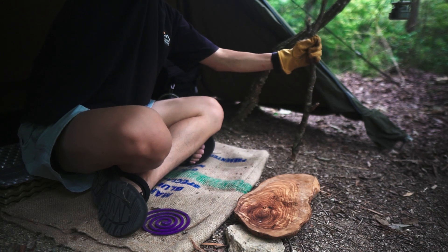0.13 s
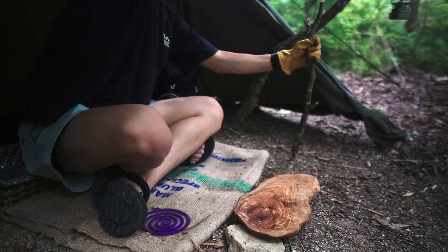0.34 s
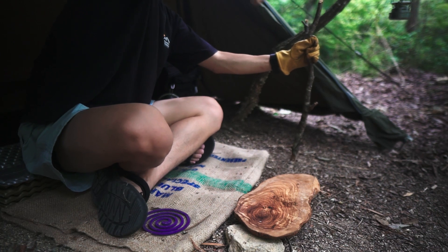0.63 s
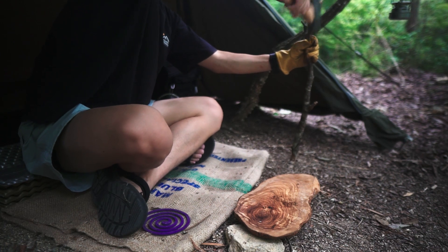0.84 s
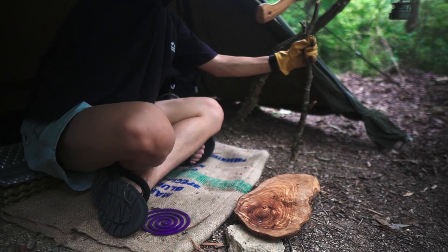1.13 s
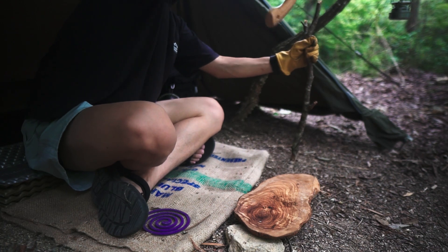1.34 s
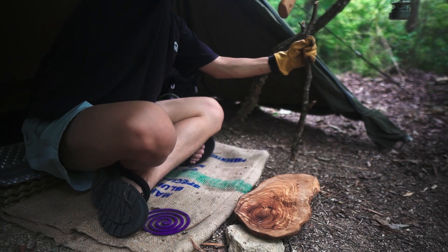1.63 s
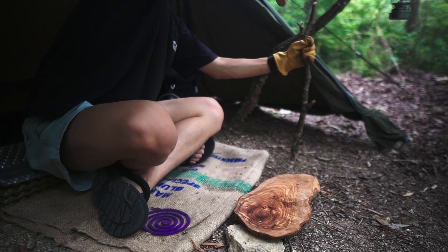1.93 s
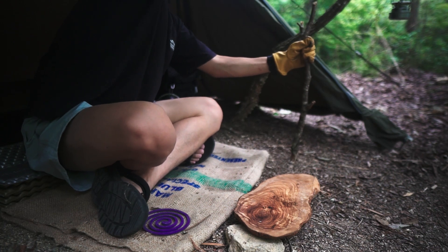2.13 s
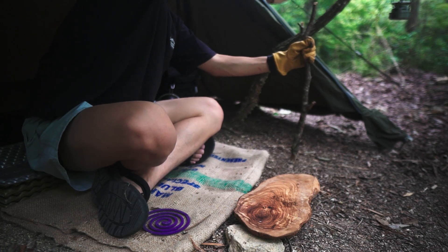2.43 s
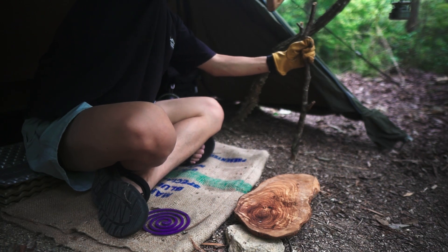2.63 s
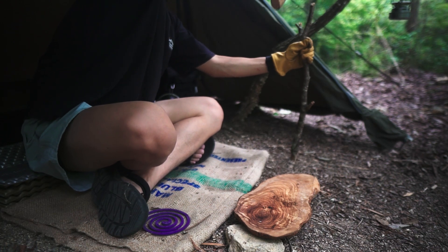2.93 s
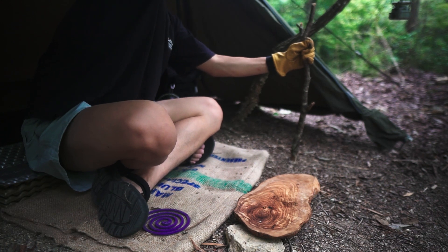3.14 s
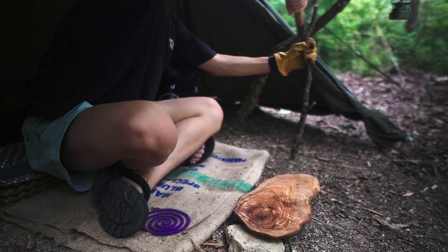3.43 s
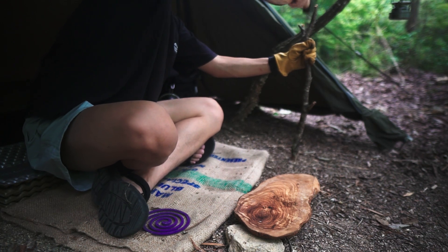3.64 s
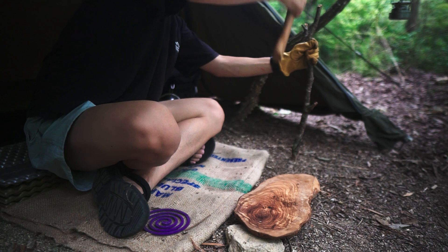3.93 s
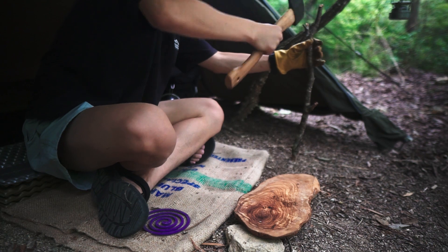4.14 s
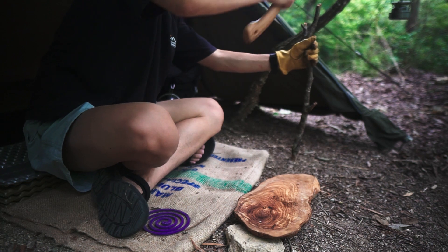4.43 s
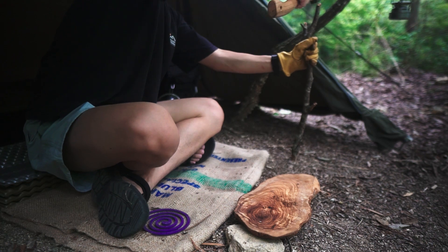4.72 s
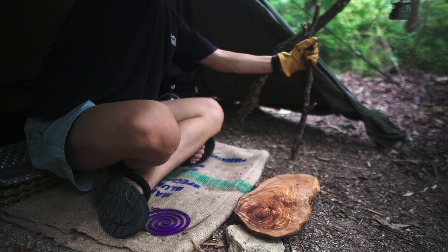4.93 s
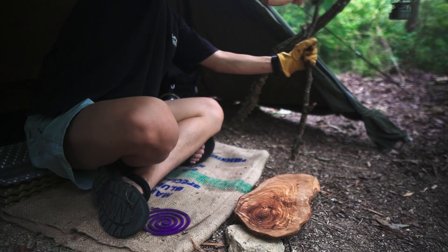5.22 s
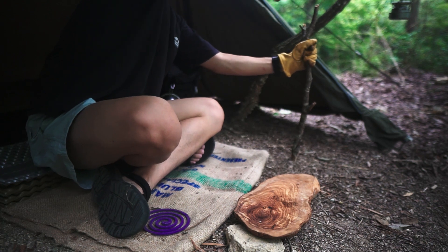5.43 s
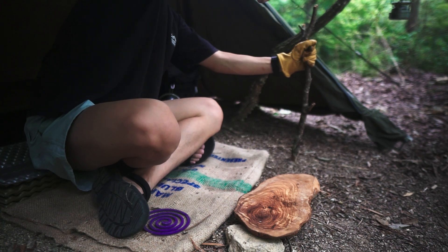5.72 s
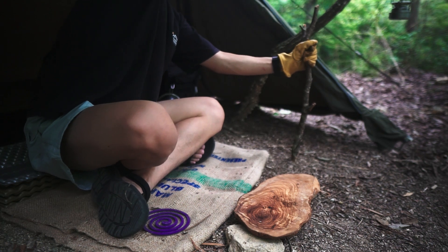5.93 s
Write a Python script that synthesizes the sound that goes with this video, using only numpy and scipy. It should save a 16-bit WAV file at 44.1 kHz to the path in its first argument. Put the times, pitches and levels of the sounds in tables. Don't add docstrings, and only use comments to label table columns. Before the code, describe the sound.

Loud wooden cracks overload the close microphone, each followed by a low soil thump and a brief rattling shiver of tarp and leaves. Blows come in a pair, then a regular series, then a gap of almost two seconds filled by hoarse upward bird whistles, leaf hiss and high insect bursts, before two more solid hits. Open woodland, little reverberation.

```python
import sys
import numpy as np
from scipy import signal
from scipy.io import wavfile
from scipy.ndimage import uniform_filter1d

SR = 44100
rng = np.random.default_rng(int(sys.argv[2]) if len(sys.argv) > 2 else 0)


def ratio_of_db(decibels):
    return 10 ** (np.asarray(decibels, float) / 20)


def waveform_to_disk(signal):
    frames = np.transpose(np.atleast_2d(signal))
    scaled = np.clip(frames, -1, 1) * 32767
    samples = np.round(scaled).astype(np.int16)
    wavfile.write(sys.argv[1], SR, samples)


N = 267687

# pitch in Hz, level in dB.
AIR_COLOUR = [(120, -63), (200, -3), (836, -12), (1350, -6), (1550, -6), (3800, -0.5), (7680, -13),
              (15800, -25)]
# pitch in Hz, level in dB.
LEAF_COLOUR = [(5000, 6), (8000, -4), (11500, -8), (13000, -12), (15800, -14)]
# time in seconds, level in dB.
GUSTS = [(0.0, -49), (0.37, -52.5), (1.08, -49.5), (1.27, -52.5), (2.89, -51), (3.13, -51.5), (3.69, -49.5),
         (4.29, -47), (5.27, -48.5), (5.49, -46.5), (5.87, -49), (6.07, -48.5)]
# time in seconds, level in dB.
FLOCK = [(0.0, -34.5), (0.41, -34.5), (0.66, -36), (1.23, -36), (1.86, -33.5), (2.62, -35), (3.36, -32),
         (3.5, -34.5), (3.75, -34), (4.11, -29.5), (4.31, -34.5), (4.8, -31), (4.94, -34), (5.21, -33.5),
         (5.43, -31.5), (6.07, -31)]
# pitch in Hz, level in dB.
BACKGROUNDS = [
    [(1250, -31), (1480, -6), (2000, -3), (2700, -6), (3300, -5)],
    [(2700, -33), (3400, -3.5), (3900, 1), (4800, -2.5), (5800, -12.5), (8000, -13), (8800, -76)],
    [(15, -12), (42, 3), (66, 1.5), (130, -6), (200, -15), (300, -34)],
]
# start in seconds, length in seconds, level in dB.
INSECT_BURSTS = [(0, .17, -51), (.25, 0.23, -57), (.55, 0.37, -59), (1.01, 0.18, -50), (1.6, .18, -57),
                 (1.98, .15, -52), (2.416, .2, -60), (2.9, .15, -52), (3.2, 0.18, -53), (3.81, .17, -53),
                 (4.33, .17, -52), (4.7, 0.35, -53), (5.35, .25, -51), (5.62, 0.26, -57)]
# pitch in Hz, level in dB.
WING_COLOUR = [(11800, -25), (12900, -3), (15000, 0), (15800, -2)]
# start in
# seconds, length in seconds, first and last pitch in Hz, level in dB.
FAR_CALLS = [(.36, 0.17, 1758, 1983, -46), (0.938, 0.21, 1845, 1960, -48),
             (1.328, 0.086, 1792, 1910, -45), (1.488, 0.18, 1926, 1853, -49.5),
             (1.61, 0.32, 1765, 1803, -46.5), (1.819, 0.24, 1836, 2056, -46),
             (2.246, 0.091, 1797, 1887, -45.5), (2.499, 0.11, 1767, 1870, -45),
             (2.793, 0.11, 1845, 1997, -43.5), (2.99, 0.031, 1970, 2110, -58),
             (3.12, 0.091, 1790, 1880, -44.5), (3.26, 0.15, 1856, 1927, -48),
             (3.424, .06, 1768, 1677, -39.5), (3.682, 0.14, 1780, 1903, -46.5),
             (3.864, 0.22, 1917, 1932, -48.5), (4.548, 0.15, 1850, 1896, -46),
             (4.799, 0.15, 1858, 1813, -46.5), (5.105, 0.11, 1780, 1876, -47),
             (5.543, .13, 1841, 1883, -43.5), (0.11, 0.14, 1846, 2036, -48.5),
             (0, 0.35, 1502, 1810, -48.5), (0.268, 0.11, 1518, 1685, -52),
                  (0.557, 0.17, 1670, 1570, -67), (0.823, .1, 1560, 1770, -45.5),
                  (1.192, 0.18, 1510, 1590, -54.5), (1.6, 0.18, 1504, 1550, -53.5),
                  (2.2, 0.22, 1510, 1574, -58), (3.02, 0.081, 1450, 1580, -53),
                  (3.252, 0.13, 1510, 1946, -47.5), (3.585, 0.17, 1530, 1820, -56),
                  (3.82, .32, 1480, 1762, -50), (4.655, 0.18, 1482, 1810, -46.5),
                  (5.385, 0.22, 1444, 1814, -47.5)]
# start in seconds, length in seconds, first and last pitch in Hz, level in dB.
NEAR_CALLS = [(3.94, .13, 2300, 2480, -43.5), (4.049, .24, 2645, 2903, -40.5),
              (4.279, 0.043, 2900, 3420, -40), (5.169, 0.095, 2040, 2073, -40.5),
              (5.243, 0.033, 2070, 2480, -45), (5.446, 0.13, 2045, 2040, -45.5),
              (5.701, .2, 1874, 1937, -47), (5.876, .07, 1965, 2310, -50), (5.916, .19, 2215, 2560, -44)]
# start in seconds, length in seconds, centre in Hz, width in octaves, level in dB.
SCRAPES = [(0.878, 0.046, 3380, 1.04, -25.5), (.872, 0.036, 586, 3, -25), (.873, .04, 11000, 0.97, -33),
           (.95, 0.078, 4170, 0.77, -34), (3.414, 0.02, 3070, 1.5, -23), (3.425, 0.093, 2920, 1.6, -33.5),
           (3.953, 0.82, 6800, 1.6, -49.5), (4.052, 0.081, 920, 1.2, -43.5), (4.137, 0.31, 790, 1.8, -43.5),
           (4.943, 0.44, 610, 1.7, -52), (0, .02, 900, 2.1, -41)]
# start in seconds, centre in Hz, level in dB.
SNAPS = [(.8742, 1500, -26), (.8745, 3200, -23), (.9095, 10000, -27), (1.9468, 10500, -38),
         (1.9478, 3800, -22), (2.953, 9000, -40), (3.4265, 10000, -28), (3.4535, 4600, -31),
         (4.803, 3200, -31), (5.779, 4200, -28)]
# start in seconds, crack peak in dB, crack pitch in Hz, thud level in dB,
# soil tuning as a factor.
BLOWS = [(0.198, 11.5, 1865, -0.5, 1.03), (0.517, 9.5, 2010, 1, 1.02), (1.44, 6, 1880, -0.5, 1.02),
         (1.787, 12, 2260, -1, 1.07), (2.127, 10, 2170, -0.5, 1.04), (2.449, 11, 2190, 0.5, 1.03),
         (2.765, 10.5, 2260, 0, 1.06), (3.092, 11.5, 2210, -0.5, 1.001), (3.415, 9.5, 1680, -9.5, 1.19),
         (5.287, 10, 1920, 0, 1.02), (5.686, 5.5, 1850, 1.5, 1.04)]
# pitch in Hz for a 2200 Hz crack, level in dB,
# time to fade by 60 dB in seconds.
STAKE_MODES = [(479, -14.5, 0.031), (825, -8, 0.0093), (1185, -10.5, 0.016), (1470, -4, 0.0083),
               (1900, -5, 0.004), (2300, 5, 0.005), (3100, 4, 0.0045), (3700, -5, 0.005), (4500, -3, 0.004),
               (5200, -12, 0.004), (7100, -3, 0.0022), (9300, -10.5, 0.001), (13040, -17, 0.0021)]
# pitch in Hz, level in dB, time to fade by 60 dB in seconds,
# first push up (1) or down (-1).
SOIL_MODES = [(43, -25, .35, 1), (58.1, -30, .3, 1), (82.1, -7.0, .196, -1), (96.1, -1.5, .262, 1),
              (99.6, -3.4, .171, -1), (114.7, -12.1, .33, 1), (126.5, -20.2, .233, -1),
              (143.1, -12.1, .157, 1), (200, -26, .18, 1), (218.1, -25.1, .148, -1),
              (265.4, -20.7, .137, -1), (300, -33, .12, 1), (435, -33, .1, 1)]
# delay in seconds, gain with its sign.
GROUND_WAVES = [
    (-0.0001, 1.01),
    (0.0163, 0.57),
    (0.031, 0.58),
    (0.0421, -0.61),
]
# pitch in Hz, level in dB.
SCATTER_COLOUR = [(150, -14), (300, -1), (700, -6), (1500, -3.5), (3000, 1.5), (6000, -12.5),
                  (10000, -30.5), (16000, -24)]
# pitch in Hz, level in dB.
TARP_COLOUR = [(150, 5), (300, 3), (700, -9), (1300, -10), (3000, -5.5), (6000, -15.5), (10000, -32),
               (15800, -32)]
# pitch in Hz, level in dB, time to fade by 60 dB in seconds.
GLANCE_MODES = [(1780, -3, 0.019), (1530, -10, 0.027), (3200, -8, .02)]


def evened(x):
    return x / np.sqrt(np.mean(x ** 2) + 1e-20)


def add(mix, s, sound):
    part = mix[max(round(s * SR), 0):][:len(sound)]
    part += sound[:len(part)]


def noise(colour, patchy_db, count=N):
    hz = np.fft.rfftfreq(1024, 1 / SR)
    colour_hz, db = np.transpose(colour)
    real, imaginary, patches = rng.standard_normal((count // 256 + 6, 513, 3)).T
    patches = uniform_filter1d(patches, size=3, axis=0)
    patches = evened(uniform_filter1d(patches, size=14, axis=1))
    colour_db = np.interp(np.log(hz + 1), np.log(colour_hz + 1), db, -90, -90)[:, None]
    spectra = (real + 1j * imaginary) * ratio_of_db(colour_db + patchy_db * patches)
    sound = signal.istft(spectra, nperseg=1024, noverlap=768)[1]
    return evened(sound[600:600 + count])


def forest():
    t = np.arange(N) / SR
    flock_db = np.interp(t, *np.transpose(FLOCK)) + 34
    gust_db = np.interp(t, *np.transpose(GUSTS)) + 54
    low_band, octave_band, rumble_band = BACKGROUNDS
    out = ratio_of_db(-40) * noise(AIR_COLOUR, patchy_db=2.9)
    out = out + ratio_of_db(-54.5 + 1.88 * gust_db) * noise(LEAF_COLOUR, patchy_db=5.0)
    out = out + ratio_of_db(-39.5 + 0.6 * flock_db) * noise(low_band, patchy_db=3.0)
    out = out + ratio_of_db(-38 + 1.52 * flock_db) * noise(octave_band, patchy_db=2.5)
    linger = ratio_of_db(0) * np.exp(-abs(t + 0.082) / 0.21)
    for s, _, _, thud_db, _ in BLOWS:
        linger = linger + ratio_of_db(thud_db) * np.exp(-abs(t - s) / 0.21) * (t > s)
    rumble_level = ratio_of_db(-40.5) + ratio_of_db(-32) * uniform_filter1d(linger, size=2000)
    return out + rumble_level * noise(rumble_band, patchy_db=1.0)


def insect():
    level = np.zeros(N)
    for s, length, db in INSECT_BURSTS:
        add(level, s, ratio_of_db(db) * signal.windows.tukey(round(length * SR), .3))
    return level * noise(WING_COLOUR, patchy_db=3.0)


def whistle(start, length, first_hz, last_hz, db, wobble, hoarse):
    t = np.arange(0, length, 1 / SR)
    climb = (t / length) ** 2.0
    hz = first_hz + (last_hz - first_hz) * climb
    low_db = db + 0.5 * (climb - .5)
    beak_hz, beak_width_hz, beak_db = 4150, 750, 4.5
    octave_db = low_db + beak_db - 10 * np.log10(1 + ((2 * hz - beak_hz) / beak_width_hz) ** 2)
    waver, flutter, rasp = rng.standard_normal((20000, 3))[:len(t)].T
    waver = evened(uniform_filter1d(waver, size=300))
    flutter = evened(uniform_filter1d(flutter, size=200))
    rasp = evened(uniform_filter1d(rasp, size=70))
    turn = 2 * np.pi * np.cumsum(hz * (1 + wobble * waver)) / SR
    low = ratio_of_db(low_db) * np.sin(turn) * evened(1 + hoarse * flutter)
    octave = ratio_of_db(octave_db) * np.sin(2 * turn) * evened(1 + 2 * hoarse * rasp)
    return start, np.sqrt(2) * (low + octave) * signal.windows.tukey(len(t), .4)


def birds():
    out = np.zeros(N)
    for call in FAR_CALLS:
        add(out, *whistle(*call, wobble=.022, hoarse=.8))
    for call in NEAR_CALLS:
        add(out, *whistle(*call, wobble=0.009, hoarse=0.35))
    trunks = rng.standard_normal(12000) * np.exp(-np.arange(12000) / SR / 0.033)
    echoes = signal.fftconvolve(out, trunks / np.linalg.norm(trunks))[:N]
    return ratio_of_db(5.5) * out + ratio_of_db(3.5) * echoes


def grit(length, hz, octaves):
    clicks, size, clump = rng.standard_normal((20000, 3)).T
    clump = evened(uniform_filter1d(clump, size=90))
    clicks = clicks * ratio_of_db(3.0 * size + 2.5 * clump)
    edges = np.minimum(hz * 2 ** (octaves * np.array([-.5, .5])), SR / 2 - 1000)
    b, a = signal.butter(2, edges, "bandpass", fs=SR)
    return evened(signal.lfilter(b, a, clicks)[:round(length * SR)])


def bark():
    out = np.zeros(N)
    for s, length, hz, octaves, db in SCRAPES:
        rub = grit(length, hz, octaves)
        add(out, s, ratio_of_db(db) * rub * signal.windows.tukey(len(rub), 0.52))
    for s, hz, db in SNAPS:
        snap = grit(.004, hz, octaves=1.1)
        add(out, s, ratio_of_db(db) * snap * np.linspace(1.7, 0, len(snap)))
    return out


def ring(hz, t60, count):
    t = np.arange(count) / SR
    return np.exp(-np.log(1000) * t / t60) * np.sin(2 * np.pi * hz * t)


def crack(crack_hz, knock_db, crush):
    t = np.arange(len(crush)) / SR
    touch = 0.22 * np.exp(-((t - .0003) / 0.00036) ** 2)
    force = touch + np.exp(-((t - .0017) / 0.00057) ** 2)
    crush = (crush + .3 * rng.standard_normal(len(crush))) * force
    crush[66] += 10.3
    stake = np.zeros(2000)
    for hz, db, t60 in STAKE_MODES:
        if hz < 1400:
            db = db + knock_db
        elif hz > 1400:
            hz = hz * (crack_hz / 2200) ** .6
        stake += ratio_of_db(db) * ring(min(hz, 16000), t60, count=2000)
    out = signal.fftconvolve(crush, stake)
    return out / abs(out).max()


def thud(tuning):
    soil = np.zeros(14000)
    for hz, db, t60, sign in SOIL_MODES:
        soil += sign * ratio_of_db(db) * ring(hz * tuning, t60, count=14000)
    out = np.zeros(18000)
    for delay, gain in GROUND_WAVES:
        add(out, delay / tuning, gain * soil)
    return out


def shiver():
    t = np.arange(9000) / SR
    late = np.maximum(t - .036, 0)
    scatter = 8.7 * np.exp(-t / 0.0057) * (t > .002) + 1.44 * np.exp(-t / 0.034)
    shake = 1.7 * (1 - np.exp(-late / 0.00071)) * np.exp(-late / 0.042) + 0.33 * np.exp(-t / 0.056)
    scattered = scatter * noise(SCATTER_COLOUR, patchy_db=4.5, count=9000)
    return scattered + shake * noise(TARP_COLOUR, patchy_db=0.5, count=9000)


def hatchet():
    out = np.zeros(N)
    crush = rng.standard_normal(150)
    for s, peak_db, hz, thud_db, tuning in BLOWS:
        knock_db = -3 + 2.2 * thud_db
        add(out, s - .0009, ratio_of_db(peak_db + 10.0) * crack(hz, knock_db, crush))
        add(out, s, ratio_of_db(thud_db) * thud(tuning))
        add(out, s, ratio_of_db(-32.5 + 0.53 * thud_db) * shiver())
    for hz, db, t60 in GLANCE_MODES:
        add(out, 3.4165, ratio_of_db(db) * ring(hz, t60, count=3000))
    return out


def scene():
    return (forest() + insect() + birds() + bark() + hatchet())[None]


def roll_off(x):
    return signal.sosfilt(signal.butter(12, 15800, fs=SR, output="sos"), x)


def record(dry):
    clipped = np.clip(dry, -.99, .99)
    return roll_off(clipped)


dry = scene()
out = record(dry)
waveform_to_disk(out)
```